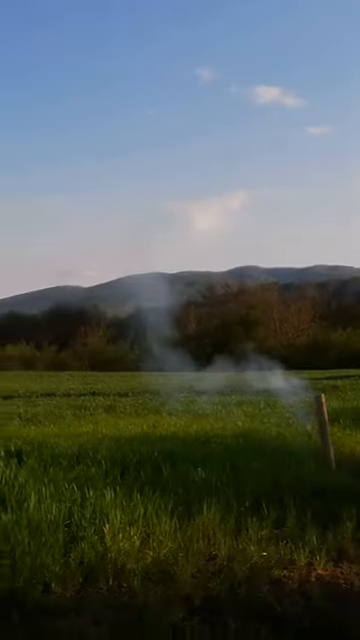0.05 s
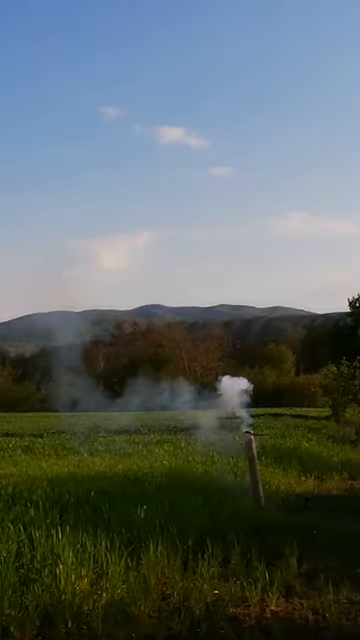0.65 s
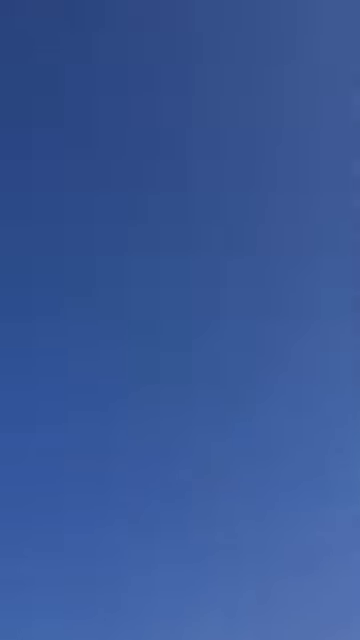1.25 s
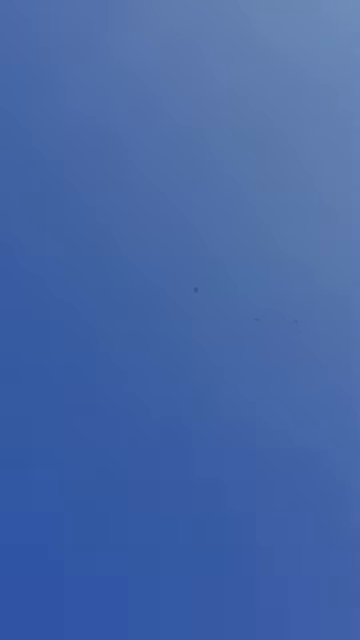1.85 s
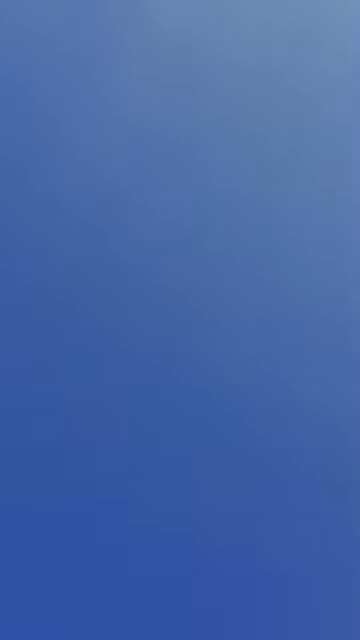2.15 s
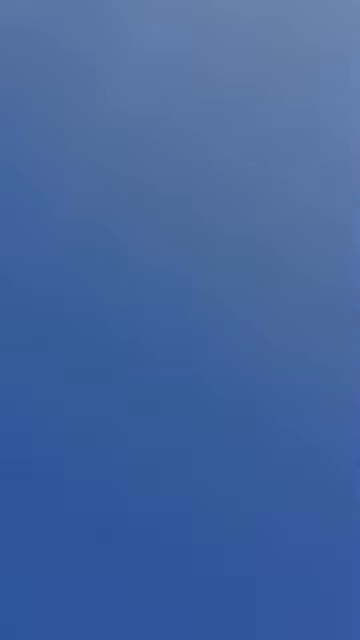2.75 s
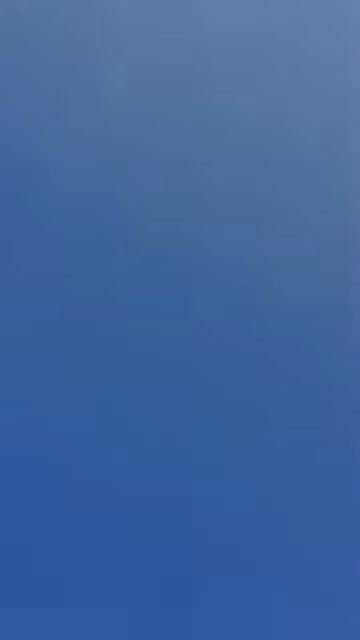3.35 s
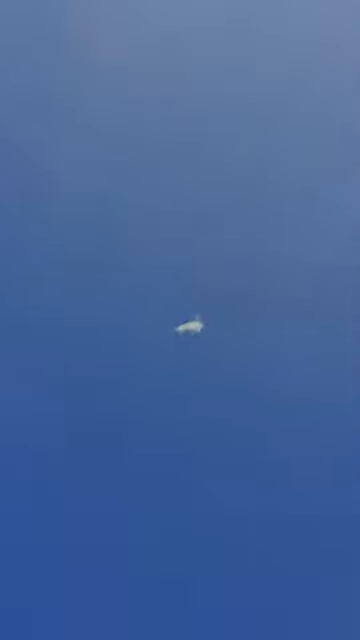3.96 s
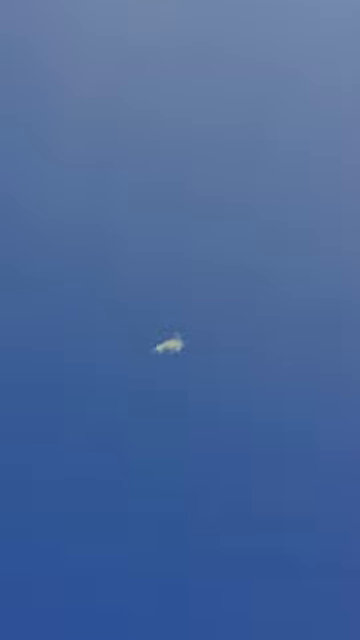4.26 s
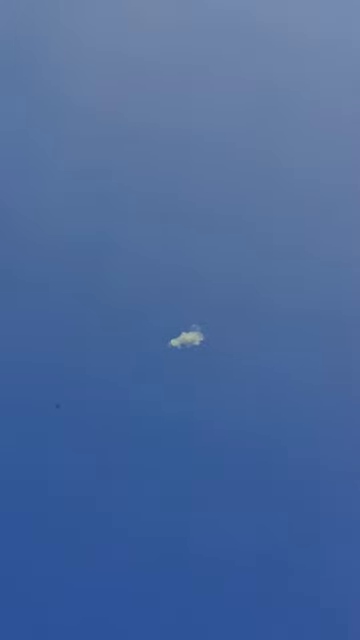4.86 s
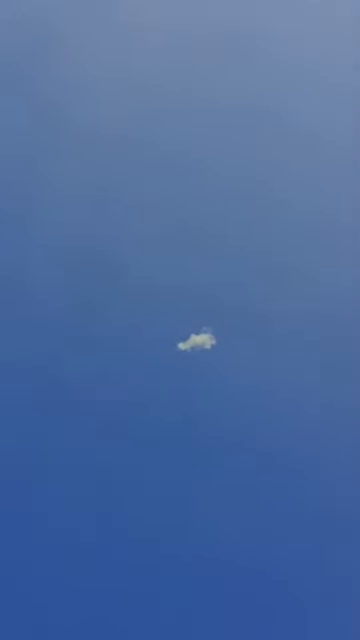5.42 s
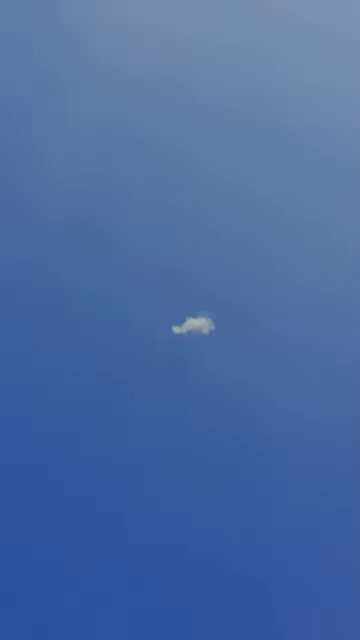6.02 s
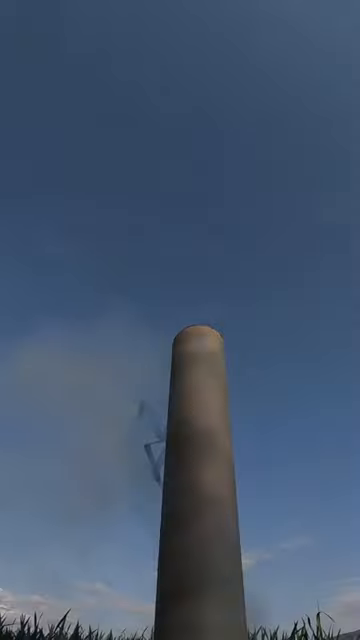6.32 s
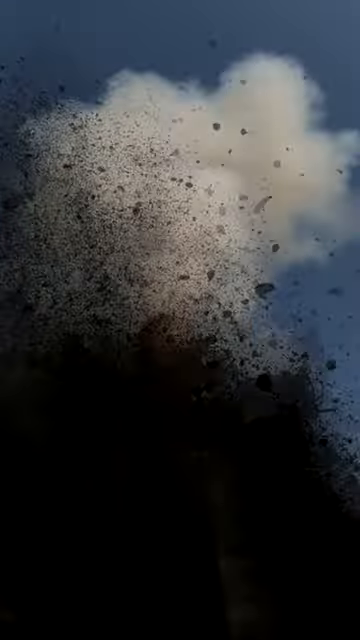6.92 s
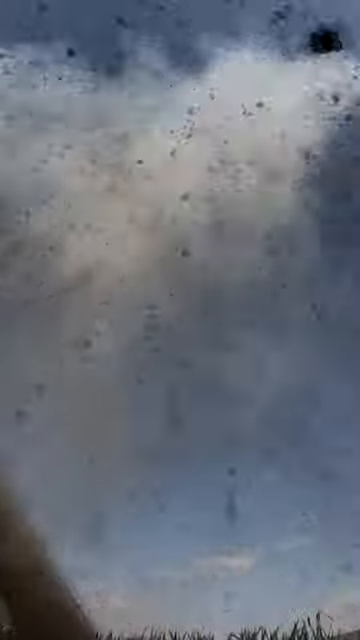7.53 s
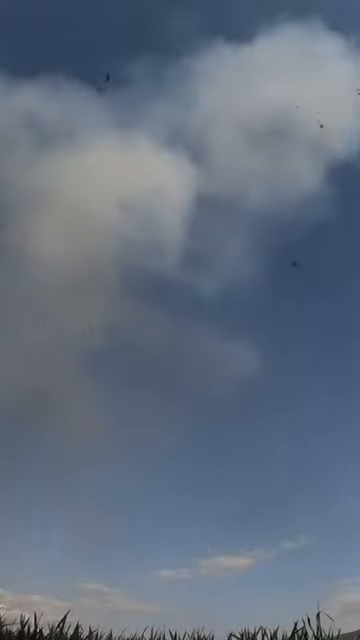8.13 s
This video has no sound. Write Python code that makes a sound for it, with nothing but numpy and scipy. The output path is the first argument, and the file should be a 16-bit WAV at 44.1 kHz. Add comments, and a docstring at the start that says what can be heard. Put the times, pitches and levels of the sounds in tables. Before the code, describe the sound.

A short sputter of fuse leads into the echoing boom of a firework fired from a tube across a field. Gusts buffet the microphone until the shell explodes high above with a loud crack that rolls back from the hills. Then the wind dies away, a fuse hisses and pops close to the microphone, and a deep, loud launch blast sends debris ticking and thudding onto dry grass.

```python
"""Fireworks in an open field, wind buffeting the microphone. Some way off a fuse rushes and pops in
its tube; at 0.8 s the lift charge booms and echoes off the trees. At 3.9 s the shell bursts high
overhead. From 6.2 s the microphone moves down into the shelter of the grass, a second fuse spurts
close by, and its charge fires at 6.9 s. Grit, then cardboard scraps, patter down all around."""
import sys
import numpy as np
from scipy import signal
from scipy.fft import rfft, irfft, next_fast_len
from scipy.io import wavfile
from scipy.ndimage import uniform_filter1d

SR = 44100
rng = np.random.default_rng(int(sys.argv[2]) if len(sys.argv) > 2 else 0)


def master_out(mix):
    """Clip the mix to full scale and print it as 16-bit PCM to the path in sys.argv[1]."""
    frames = np.transpose(np.atleast_2d(mix))
    ceiling = np.clip(frames, -1, 1)
    pcm = np.round(ceiling * 32767).astype(np.int16)
    wavfile.write(sys.argv[1], SR, pcm)


N = 360914
T = np.arange(N) / SR


# Pressure fronts of the far launch, the burst overhead with its ground echo, and the near launch:
# (time [s], level [dB], length [s], brightness [Hz], low cut [Hz])
PRESSURE_FRONTS = [(0.8374, 6, 0.0052, 765, 162), (0.8535, -5, 0.0071, 1500, 108),
                   (3.9278, 19.5, 0.0017, 3000, 268), (3.9412, -5.5, 0.0022, 880, 240),
                   (6.8753, 16.5, 0.0036, 298, 164), (6.8984, 0, 0.0086, 298, 88),
                   (6.9152, -1, 0.011, 151, 35.4)]

def blasts(dip_hz=1400, dip_q=2.6, second_cut_ratio=0.76):
    """A pressure jump and its suction overload the microphone, whose low cut makes it swing a few times."""
    out, t = np.zeros(N), T[:SR // 4]
    for s, db, length, bright_hz, low_hz in PRESSURE_FRONTS:
        front = -from_db(db) * (1 - t / length) * np.exp(-t / length)
        swing = cut(cut(front, bright_hz, "low"), low_hz, "high", order=3)
        overloaded = np.clip(swing, -1, 1)
        add(out, s, cut(overloaded, second_cut_ratio * low_hz, "high", order=3))
    return signal.lfilter(*signal.iirnotch(dip_hz, dip_q, fs=SR), out)


# Burning powder, far from the microphone and close to it: (frequency [Hz], level [dB])
FAR_POWDER_HISS = [(710, -37), (1200, -5), (1400, -19), (1770, -5.5), (2450, -1), (4600, -2), (6580, -5),
                   (10800, -10), (16000, -22.5)]
NEAR_POWDER_HISS = [(710, -21), (1200, -5.5), (1430, -11.5), (2230, 0.5), (2480, -1), (3620, 1),
                    (7740, -6.5), (9010, -1), (9510, -3.5), (10700, -18), (13900, -17.5), (16000, -36)]
FAR_POWDER_ROAR = [(40, -3), (110, -2.5), (190, -0.5), (245, 3), (350, -14.5), (520, -3), (950, -11.5),
                   (2000, -41)]
NEAR_POWDER_ROAR = [(30, -9), (70, -3), (220, -0.5), (330, -8), (480, -20), (950, -18), (2000, -51)]
# Flame at the far and the near muzzle: (time [s], length [s], roar [dB], crackle [dB])
FAR_FLAMES = [(.834, .006, -22.5, -31), (.8565, 0.0086, -13, -20.5), (.869, 0.0078, -11.5, -20.5)]
NEAR_FLAMES = [(6.868, 0.0043, -15, -29), (6.888, 0.008, -16.5, -27.5), (6.9, 0.011, -12, -23.5)]

def muzzle_jets(flames, roar_colour, crackle_colour, likeness, fall_s, rough_db, rise_s=0.0017):
    """Burning gas follows the shell out of the muzzle: a low roar with a tearing crackle."""
    roar, crackle, t = np.zeros(N), np.zeros(N), T[:SR // 4]
    for s, length, roar_db, crackle_db in flames:
        flow = np.minimum(t / rise_s, 1) * np.exp(-np.maximum(t - length, 0) / fall_s)
        add(roar, s, from_db(roar_db) * flow)
        add(crackle, s, from_db(crackle_db) * flow)
    roar = roar * evened(noise(roar_colour), 0.0093)
    return roar + crackle * noise(crackle_colour, likeness) * flicker(900, rough_db)


# Spurts of the far and the near fuse: (time [s], rise [s], fall [s], hiss [dB], flutter [dB])
FAR_FUSE_SPURTS = [(.385, 0.021, 0.016, -21.5, -32), (.45, 0.017, 0.029, -27, -43.5),
                   (.491, 0.006, 0.0069, -31.5, -25.5), (.578, 0.012, 0.0088, -24.5, -28.5),
                   (.65, 0.022, .05, -43.5, -55), (.838, 0.009, 0.02, -36, -35)]
NEAR_FUSE_SPURTS = [(6.37, 0.024, 0.037, -25, -26.5), (6.424, 0.0065, 0.0061, -30, -20),
                    (6.485, 0.019, 0.025, -22.5, -40), (6.52, 0.0063, 0.0089, -29, -25),
                    (6.6, 0.013, 0.013, -20.5, -29.5), (6.617, 0.0057, 0.015, -48, -20),
                    (6.872, 0.016, 0.02, -39.5, -31)]
# Stereo image of the tube at close range: (frequency [Hz], left-right likeness [0-1])
CLOSE_IMAGE = [(300, 0.98), (3000, 0.77), (7000, 0.4)]

def fuse(spurts, hiss_colour, flutter_colour, likeness, sputter_db):
    """Flame races through a paper sleeve in spurts: a sputtering hiss over a low flutter."""
    hiss, flutter = 0, 0
    for s, rise, fall, hiss_db, flutter_db in spurts:
        flow = swell(s, rise, fall)
        hiss += from_db(hiss_db) * flow
        flutter += from_db(flutter_db) * flow
    hiss = hiss * noise(hiss_colour, likeness) * flicker(500, sputter_db)
    return hiss + flutter * evened(noise(flutter_colour, likeness), .02)


# Fuse pops in the tube, two far, two near: (time [s], crack [dB], ring [dB], ring brightness [Hz])
FUSE_POPS = [(.646, -15, -13, 3000), (.685, -31, -20.5, 1474), (6.6702, -16, -6.5, 350),
             (6.714, -41, -13.5, 190)]
# Air column of the tube: (frequency [Hz], level [dB], t60 [s])
TUBE_MODES = [(217, 4, 0.038), (225, -18.5, 0.31), (450, -1.5, 0.021), (780, 1.5, 0.032),
              (844, -22.5, 0.14), (2340, -11.5, 0.027)]

def tube_pops(rise_s=.0018, fall_s=0.0013, crack_hz=6000, low_hz=110):
    """Each pop swells briefly, cracks and sets the air in the tube ringing."""
    cracks, rings = 0, np.zeros(N)
    tube = cut(sum(from_db(db) * ring(hz, t60) for hz, db, t60 in TUBE_MODES), low_hz, "high")
    for s, crack_db, ring_db, bright_hz in FUSE_POPS:
        cracks += from_db(crack_db) * swell(s, rise_s, fall_s)
        add(rings, s, -from_db(ring_db) * cut(tube, bright_hz, "low", order=1))
    crack_noise = cut(noise(FAR_POWDER_HISS), crack_hz, "low", order=1)
    return cracks * evened(crack_noise, 0.0028) + rings


def casing(s=3.9277, crack_db=-11.5, bright_hz=3800, bark_db=-5.5):
    """High overhead the casing tears open: a ragged crack and a short bark at the head of the burst."""
    tearing = evened(cut(noise(FAR_POWDER_HISS), bright_hz, "low", order=4), 0.0011)
    out = from_db(crack_db) * swell(s, rise_s=0.00062, fall_s=0.00045) * tearing
    add(out, s, -from_db(bark_db) * ring(hz=950, t60=.008))
    return out


# Reports off the grass at once and the tree line later: (time [s], grass [dB], trees [dB])
REFLECTIONS = [(.875, -36, -45), (3.94, -60, -61.5), (6.67, -56.5, -79), (6.9, -54, -54.5)]
# Their colour: (frequency [Hz], level [dB])
REFLECTION_COLOUR = [(500, -29), (900, -4.5), (1350, -8.5), (2000, -0.5), (3800, 0), (8000, -12),
                     (16000, -35)]

def scatter(tree_delay_s=0.32, air_loss_db=0.06):
    """Grass and trees throw each report back; the longer the path, the more treble the air absorbs."""
    source = noise(REFLECTION_COLOUR) * flicker(170, 2.2)
    out, gain, age = 0, 0, np.zeros(N)
    for s, grass_db, trees_db in REFLECTIONS:
        grass = from_db(grass_db) * swell(s, rise_s=0.007, fall_s=.14)
        trees = from_db(trees_db) * swell(s + tree_delay_s, rise_s=0.038, fall_s=0.24)
        gain += np.hypot(grass, trees)
        age = np.where(T > s, np.minimum(T - s, 2), age)
    for edge_hz in (2000, 3500, 5000, 7000, 10000, 16000):
        band = signal.sosfiltfilt(signal.butter(4, edge_hz, fs=SR, output="sos"), source)
        source = source - band
        out += band * from_db(-air_loss_db * age * (edge_hz / 1000) ** 2)
    return gain * out


# Boom over the field after each launch: (time [s], level [dB], fall [s])
LAUNCH_BOOMS = [(.89, -29, 0.084), (6.95, -41.5, .29)]
# Returns from distant woods and hills: (time [s], rise [s], fall [s], level [dB])
DISTANT_ECHOES = [(.92, .01, 0.043, -43), (1.045, .006, 0.0084, -42), (1.22, .008, 0.062, -47.5),
                  (1.435, .012, 0.14, -39.5), (2.101, .2, 0.18, -55.5), (4.0, .02, 0.22, -53),
                  (4.349, .03, 0.37, -46), (5.298, .3, 0.27, -51.5)]
# Colours of the boom and the returns: (frequency [Hz], level [dB])
BOOM_SPECTRUM = [(25, -23.5), (65, 1), (160, -1), (225, -1), (330, -26.5), (1500, -48)]
ECHO_SPECTRUM = [(130, -29), (300, -4), (520, -4.5), (650, 1.5), (780, -5.5), (1050, -9), (1400, -23),
                 (2600, -23), (6000, -58)]

def far_echoes(boom_rise_s=0.014):
    """A low boom hangs over the field and a lumpy roll returns from woods and hills."""
    boom = sum(from_db(db) * swell(s, boom_rise_s, fall) for s, db, fall in LAUNCH_BOOMS)
    boom = boom * evened(noise(BOOM_SPECTRUM), 0.032)
    returns = sum(from_db(db) * swell(s, rise, fall) for s, rise, fall, db in DISTANT_ECHOES)
    return boom + returns * noise(ECHO_SPECTRUM) * flicker(70, 1.6)


# Biggest grains, either side of the microphone: (time [s], relative level [dB], left minus right [dB])
BIG_GRAINS = [(7.142, -23.5, -4.5), (7.226, -16.5, -2), (7.2913, -19.5, -1), (7.3527, -6, -2.5),
              (7.4125, -28, -2), (7.488, -10, -4.5), (7.5077, -14, -4), (7.5316, -13.5, 3.0),
              (7.5628, -13, 4), (7.6046, -13, -6), (7.6288, -18, -2.0), (7.662, -17, -0.5),
              (7.6799, -10, 1), (7.7258, -16, -8), (7.757, -11.5, -4), (7.795, -8, -2.5)]
# Grit on dry grass: (frequency [Hz], level [dB])
GRAIN_COLOUR = [(500, -24), (1200, -20), (1500, -23), (2400, -14), (6000, -7), (7100, -1), (9300, 1.5),
                (10600, -12), (16000, -24)]

def grit(start_s=7.11, end_s=7.81, shower_db=-38, growth_db_per_s=8.5, stragglers_db=-48.5,
         tick_db=-6.5, rise_s=0.00077, fall_s=0.00076, per_s=300, spread_db=3.5, rustle=0.29):
    """Grains tick on dry grass: a few big ones, each with a short soft onset, in a fine random patter."""
    hits = sum(from_db(db + np.array([[pan], [-pan]]) / 2) * swell(s + fall_s, rise_s, fall_s)
               for s, db, pan in BIG_GRAINS)
    growth = from_db(shower_db + growth_db_per_s * (np.clip(T, start_s, end_s) - start_s))
    flow = growth * swell(start_s, rise_s=0.011, fall_s=0.028, hold_s=end_s - start_s)
    flow += from_db(stragglers_db) * (T > end_s)
    arrivals = rng.random((2, N)) < per_s / SR
    sizes = from_db(spread_db * np.minimum(rng.exponential(1, (2, N)), 4))
    grains = rms_one(arrivals * sizes * rng.choice([-1, 1], (2, N)))
    patter = flow * (grains + rustle * rng.standard_normal((2, N)))
    ticks = from_db(tick_db) * hits * rng.standard_normal((2, N))
    shower = coloured(ticks + patter, GRAIN_COLOUR)
    late = np.interp(T, [7.84, 7.95], [0, 1])   # the last flakes land softly and sound duller
    return (1 - late) * shower + late * cut(shower, 6300, "low", order=4)


# Cardboard landing, and thuds on the ground near the microphone: (time [s], level [dB], pitch [Hz])
CARDBOARD_SCRAPS = [(7.936, -40, 3600), (7.9749, -30, 2150), (8.012, -36, 1880), (8.052, -41, 2180),
                    (8.138, -40, 3060)]
GROUND_THUDS = [(5.768, -24, 167), (7.561, -27, 74), (7.751, -27, 114), (7.821, -18.5, 74.3)]

def landings(scrap_t60=0.015, thud_t60=0.066, scuff_s=0.0033):
    """Cardboard scraps scuff and clack with a few damped modes; soft things thud."""
    out, t = np.zeros(N), T[:SR // 50]
    for s, db, hz in CARDBOARD_SCRAPS:
        contact = rng.standard_normal(len(t)) * t / scuff_s * np.exp(-t / scuff_s)
        body = ring(hz, scrap_t60) + 0.33 * ring(0.64 * hz, scrap_t60 / 2)
        body += 1.2 * ring(1.61 * hz, scrap_t60 / 4)
        clack = signal.fftconvolve(body, contact)
        add(out, s - scuff_s, from_db(db) * clack / np.abs(clack).max())
    for s, db, hz in GROUND_THUDS:
        add(out, s, from_db(db) * (ring(hz, thud_t60) + 0.42 * ring(2.35 * hz, thud_t60 / 2)))
    return out


# Gusts on the microphone and the fine hiss of the field: (time [s], relative level [dB])
GUST_LEVEL = [(0.0, -25.5), (0.15, -17), (0.62, -28.5), (0.78, -35.5), (1.03, -29.5), (1.15, -18.5),
              (2.62, -20.5), (3.05, -16.5), (3.38, -18), (3.52, -28.5), (3.87, -23), (4.0, -35), (4.4, -27),
              (4.6, -17), (4.95, -28), (5.5, -24), (5.7, -15.5), (6.35, -20)]
AIR_HISS_LEVEL = [(0, -55), (1.9, -67.5), (2.9, -55.5), (3.3, -57), (3.42, -61), (3.9, -58), (5.55, -54),
                  (5.75, -59.5)]
# Colours of the gusts, the field's low murmur and its hiss: (frequency [Hz], level [dB])
GUST_COLOUR = [(8, -9), (21, 0), (40, -20), (90, -43), (400, -82.5)]
MURMUR_COLOUR = [(50, -23), (130, -1.5), (330, -0.5), (800, -10.5), (1400, -24), (5000, -34.5)]
AIR_HISS_COLOUR = [(900, -25.5), (2800, -6), (7000, -1.5), (11000, -2.5), (16000, -9)]
# Stereo image of the hiss: (frequency [Hz], left-right likeness [0-1])
AIR_IMAGE = [(1400, .9), (5000, 0.22)]
# The microphone moves down into the grass: (start [s], end [s])
MIC_LOWERING = [6.2, 6.65]

def open_air(reports, wind_db=0.5, murmur_db=-51.5, hiss_db=2.5):
    """Wind buffets the microphone over a murmur and a hiss that dips at each report; grass shelters it."""
    shelter = np.interp(T, MIC_LOWERING, [0, 1])
    wind = from_db(wind_db - 31 * shelter ** 2) * level(GUST_LEVEL) * evened(noise(GUST_COLOUR), .1)
    murmur = from_db(murmur_db - 11 * shelter) * noise(MURMUR_COLOUR)
    hiss = from_db(hiss_db - 24 * shelter) * level(AIR_HISS_LEVEL) * noise(AIR_HISS_COLOUR, AIR_IMAGE)
    return wind + murmur + hiss * ducking(reports)


def ducking(loud, threshold_db=-20, most_db=21, recovery_db_per_s=40):
    """A gain that drops at each loud peak and recovers steadily."""
    peak_db = 20 * np.log10(np.abs(loud).max(axis=0) + 1e-9)
    over = np.clip(peak_db - threshold_db, 0, most_db)
    recovery = recovery_db_per_s * T
    return from_db(recovery - np.maximum.accumulate(over + recovery))


# A narrow image, straight ahead of the microphone: (frequency [Hz], left-right likeness [0-1])
CENTRE_IMAGE = [(100, .998), (15000, .98)]

def noise(spectrum, likeness=CENTRE_IMAGE):
    """Stereo noise of rms 1 with a colour and a left-right likeness."""
    size = next_fast_len(N, True)
    hz = np.arange(size // 2 + 1) * SR / size
    alike = np.clip(at_hz(likeness, hz), 0, 1)
    bins = rfft(rng.standard_normal((2, size))) * from_db(at_hz(spectrum, hz))
    mid, side = irfft(bins * np.sqrt([1 + alike, 1 - alike]))[:, :N]
    return rms_one(np.array([mid + side, mid - side]))


def coloured(x, spectrum):
    """Causal filter with the given spectrum; white noise keeps its power."""
    size = next_fast_len(N + SR // 2, True) // 2 * 2
    gain = rms_one(from_db(at_hz(spectrum, np.arange(size // 2 + 1) * SR / size)))
    cepstrum = irfft(np.log(gain + 1e-9))
    cepstrum[1:size // 2] *= 2   # folding gives minimum phase
    cepstrum[size // 2 + 1:] = 0
    return irfft(rfft(x, size) * np.exp(rfft(cepstrum)))[..., :N]


def from_db(db):
    """Gain of a level in dB."""
    return 10 ** (np.asarray(db) / 20)


def rms_one(x):
    """Scales to rms 1."""
    return x / np.sqrt(np.mean(x ** 2) + 1e-20)


def at_hz(points, hz):
    """Reads (frequency [Hz], value) points on a log-frequency axis."""
    f, value = np.transpose(points)
    return np.interp(np.log(np.maximum(hz, 1)), np.log(f), value)


def level(rows):
    """Gain over time from (time [s], level [dB]) rows."""
    return from_db(np.interp(T, *np.transpose(rows)))


def swell(s, rise_s, fall_s, hold_s=0):
    """A rounded peak or plateau with exponential flanks."""
    flank = np.maximum((s - T) / rise_s, (T - s - hold_s) / fall_s)
    return 1 / np.cosh(np.clip(flank, 0, 20))


def cut(x, hz, kind, order=2):
    """Low-pass or high-pass."""
    sos = signal.butter(order, np.clip(hz, 10, .45 * SR), kind, fs=SR, output="sos")
    return signal.sosfilt(sos, x + 1e-18)


def flicker(per_s, depth_db):
    """A randomly wavering gain of rms 1."""
    return rms_one(from_db(depth_db * np.interp(T * per_s, np.arange(N), rng.standard_normal(N))))


def evened(x, span_s):
    """Takes the chance swells out of a noise."""
    power = uniform_filter1d(np.mean(x ** 2, axis=0), max(int(span_s * SR), 2))
    return x / np.sqrt(power + 1e-6)


def ring(hz, t60):
    """A struck mode, half a second long."""
    t = T[:SR // 2]
    return np.sin(2 * np.pi * hz * t) * from_db(-60 * t / t60)


def add(out, s, sound):
    """Mixes a sound in at a time."""
    start = int(s * SR)
    out[..., start:start + sound.shape[-1]] += sound[..., :N - start]


def scene():
    """A far launch, its burst overhead and a near launch, with echoes and debris, in an open field."""
    far = fuse(FAR_FUSE_SPURTS, FAR_POWDER_HISS, FAR_POWDER_ROAR, CENTRE_IMAGE, sputter_db=1.0)
    far += muzzle_jets(FAR_FLAMES, FAR_POWDER_ROAR, FAR_POWDER_HISS, CENTRE_IMAGE,
                       fall_s=0.0069, rough_db=5.0)
    near = fuse(NEAR_FUSE_SPURTS, NEAR_POWDER_HISS, NEAR_POWDER_ROAR, CLOSE_IMAGE, sputter_db=1.5)
    near += muzzle_jets(NEAR_FLAMES, NEAR_POWDER_ROAR, NEAR_POWDER_HISS, CLOSE_IMAGE,
                        fall_s=0.007, rough_db=4.0)
    reports = tube_pops() + blasts() + casing()
    return open_air(reports) + far + near + reports + scatter() + far_echoes() + grit() + landings()


def record(dry, cutoff_hz=15900):
    """The loudest reports overload the recorder; the top treble is cut."""
    low_pass = signal.ellip(10, .1, 80, cutoff_hz, fs=SR, output="sos")
    return signal.sosfilt(low_pass, np.clip(dry, -1, 1))


dry = scene()
out = record(dry)
master_out(out)
```